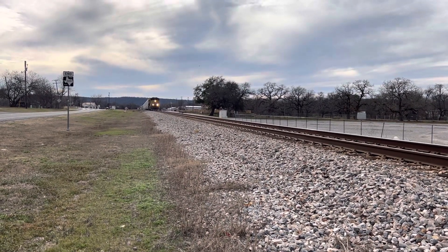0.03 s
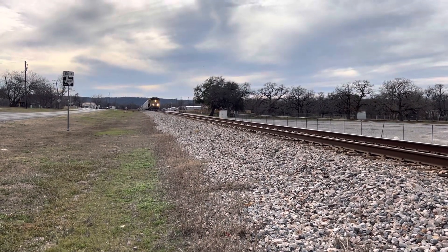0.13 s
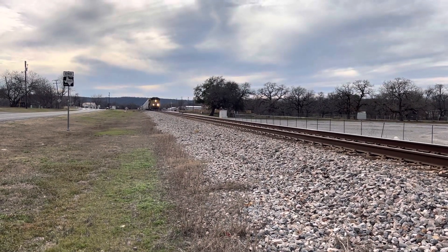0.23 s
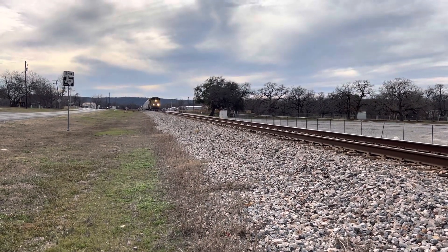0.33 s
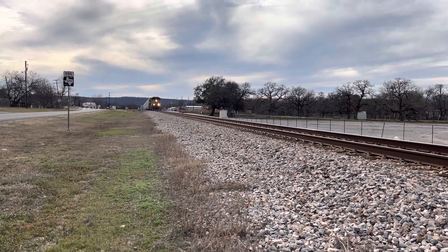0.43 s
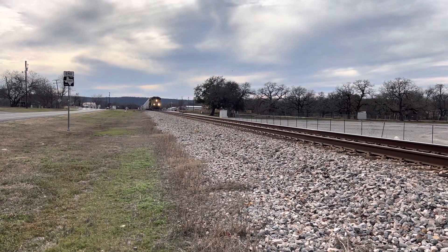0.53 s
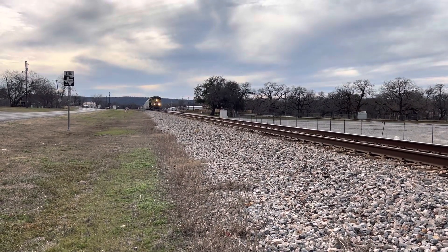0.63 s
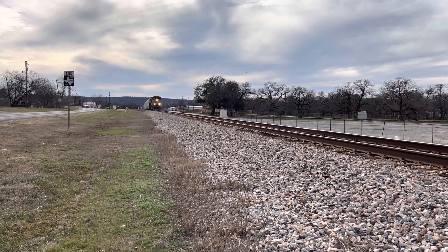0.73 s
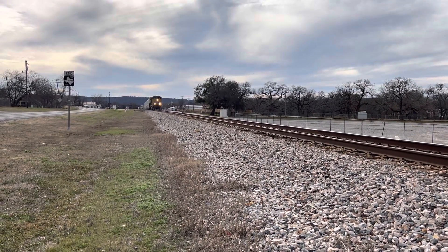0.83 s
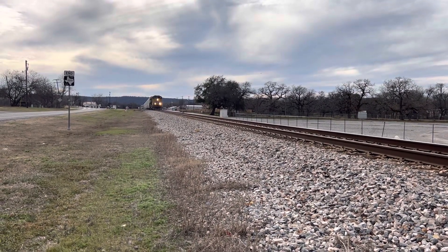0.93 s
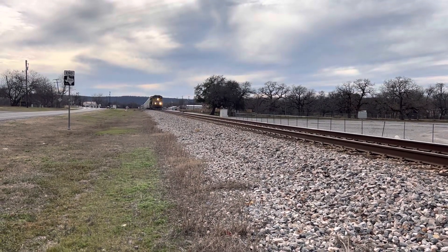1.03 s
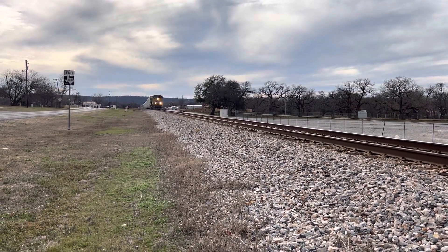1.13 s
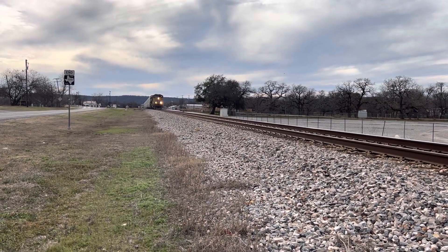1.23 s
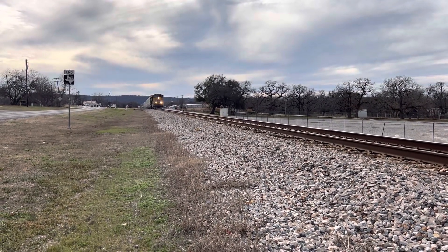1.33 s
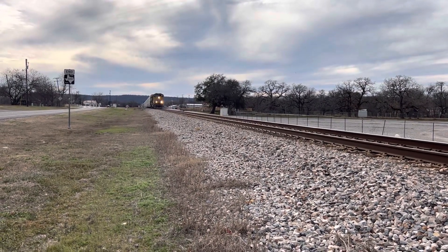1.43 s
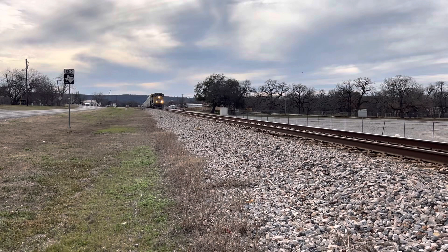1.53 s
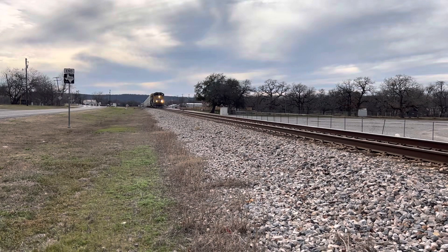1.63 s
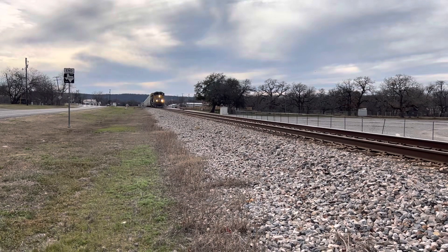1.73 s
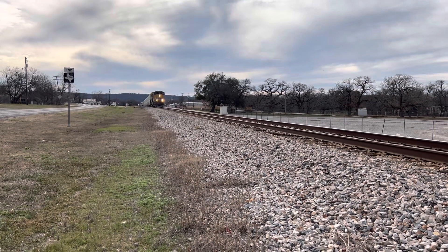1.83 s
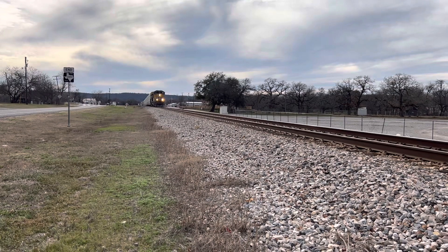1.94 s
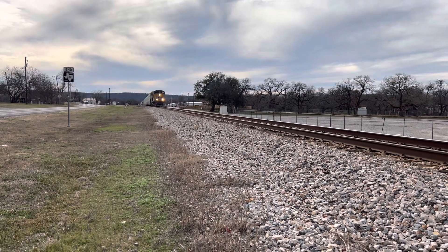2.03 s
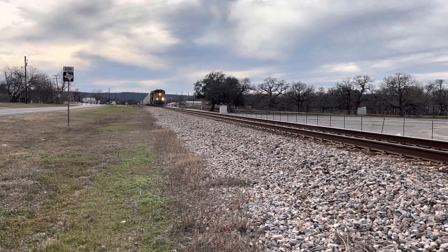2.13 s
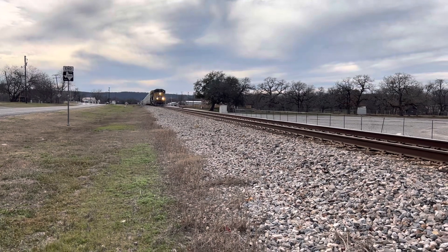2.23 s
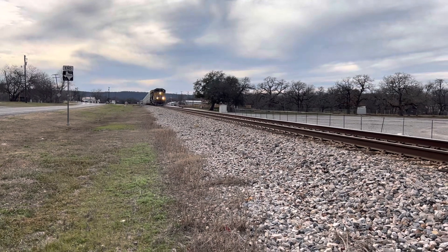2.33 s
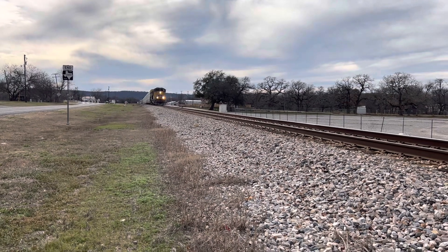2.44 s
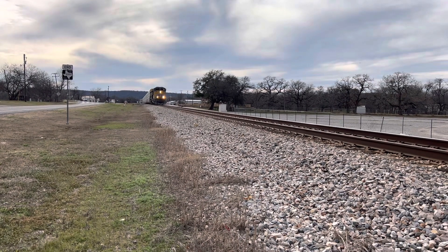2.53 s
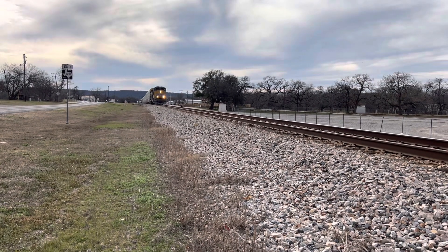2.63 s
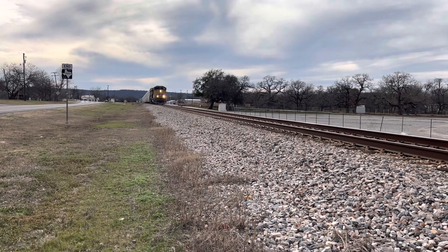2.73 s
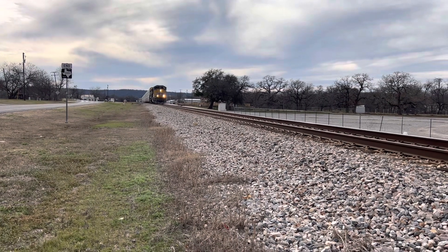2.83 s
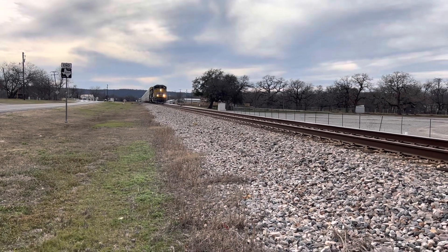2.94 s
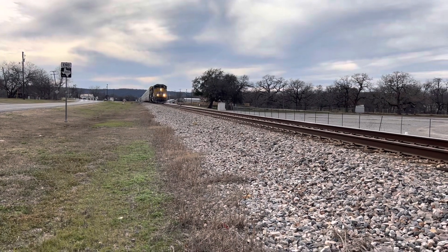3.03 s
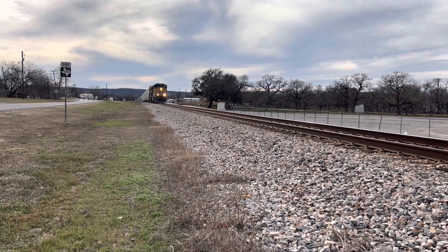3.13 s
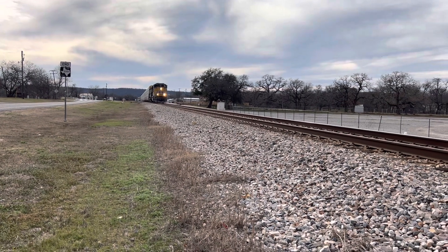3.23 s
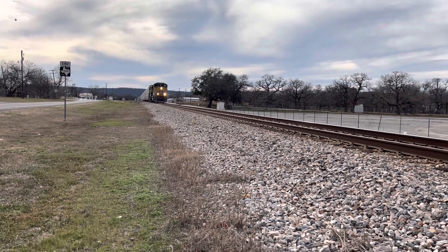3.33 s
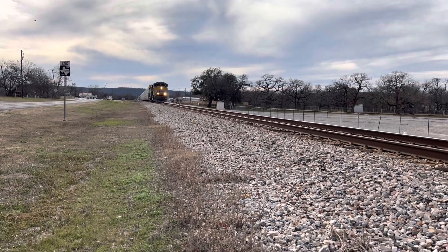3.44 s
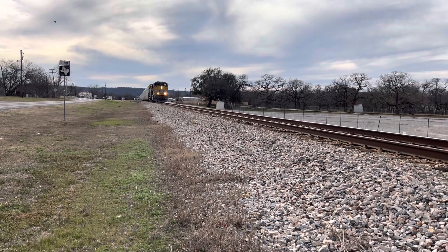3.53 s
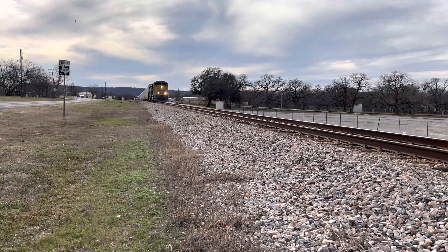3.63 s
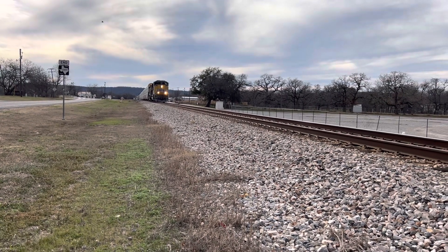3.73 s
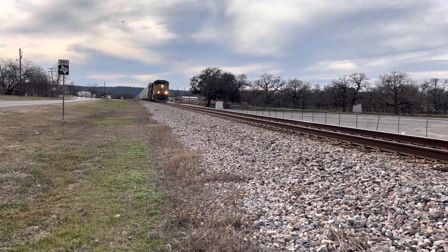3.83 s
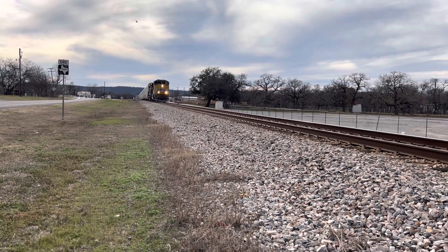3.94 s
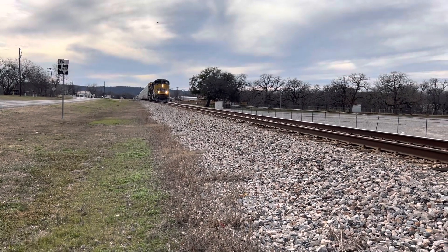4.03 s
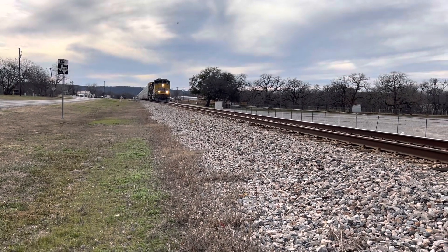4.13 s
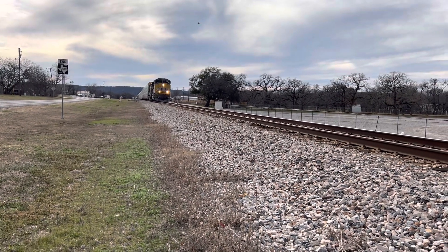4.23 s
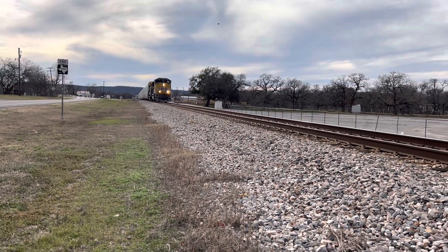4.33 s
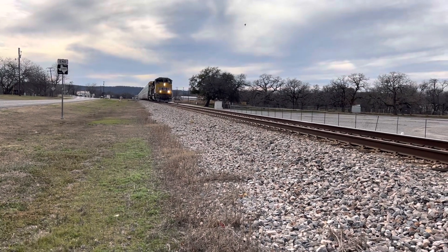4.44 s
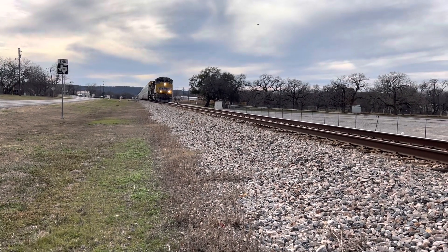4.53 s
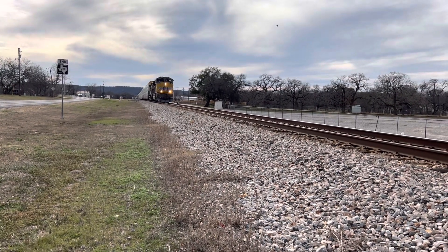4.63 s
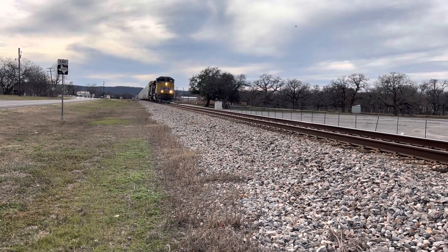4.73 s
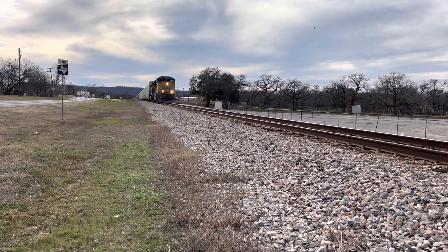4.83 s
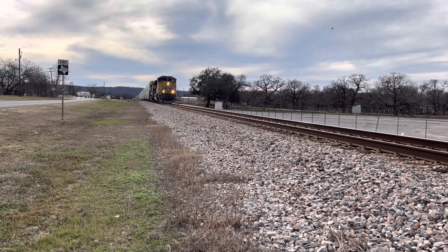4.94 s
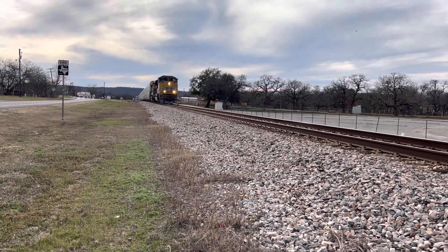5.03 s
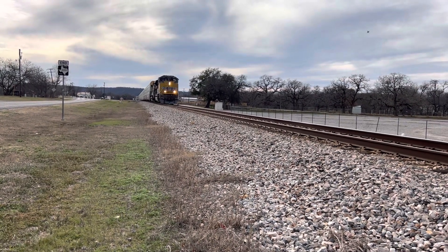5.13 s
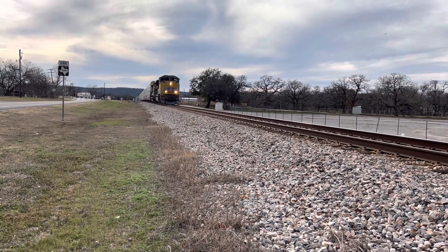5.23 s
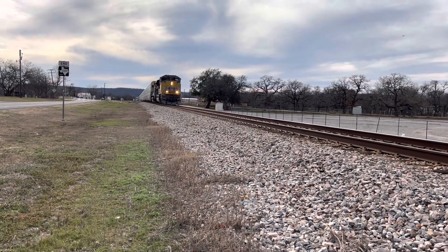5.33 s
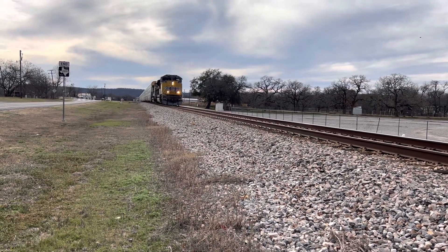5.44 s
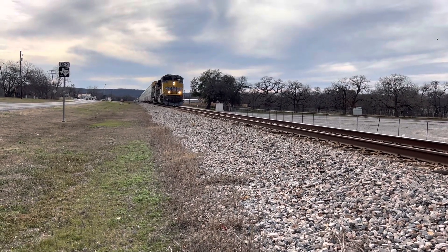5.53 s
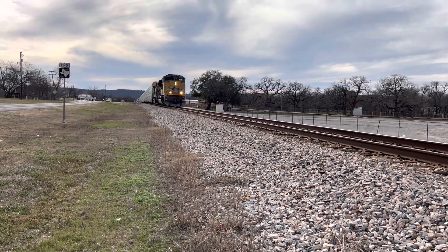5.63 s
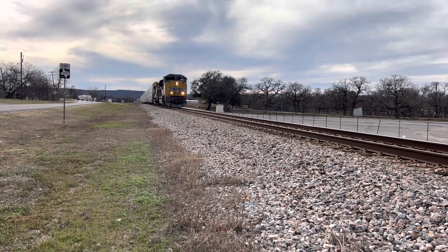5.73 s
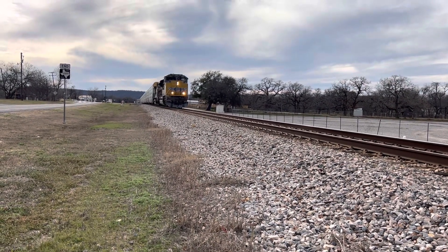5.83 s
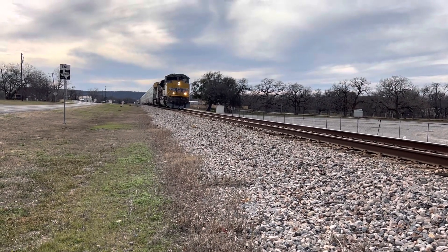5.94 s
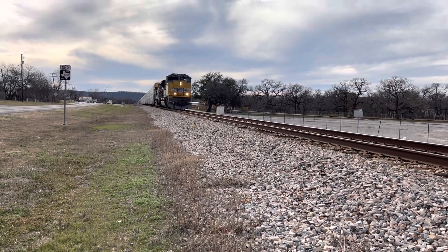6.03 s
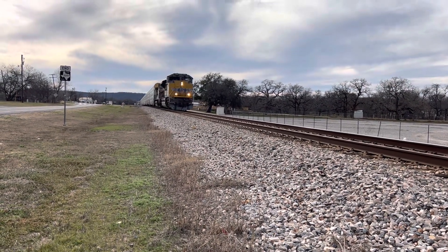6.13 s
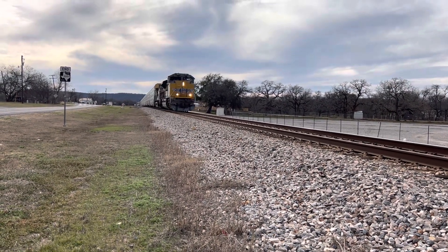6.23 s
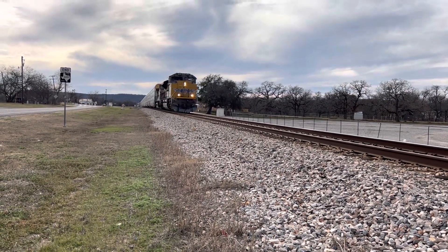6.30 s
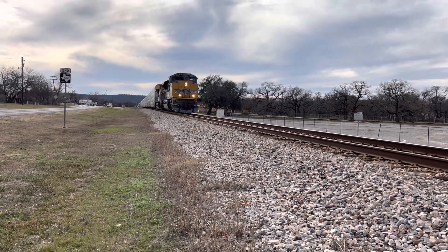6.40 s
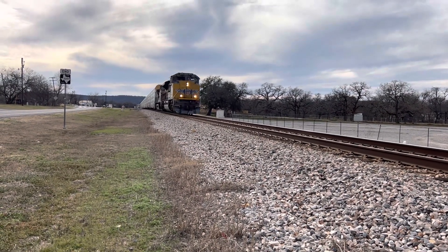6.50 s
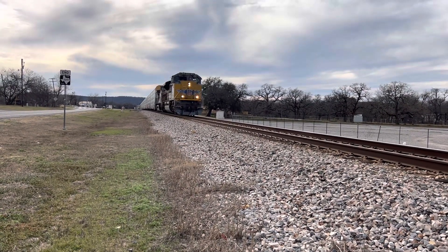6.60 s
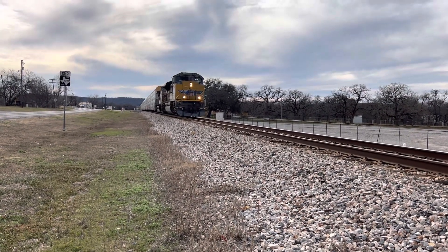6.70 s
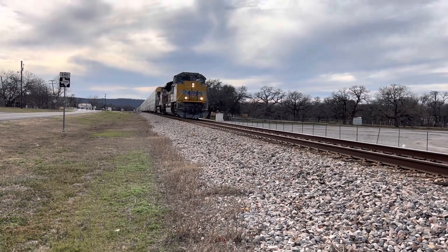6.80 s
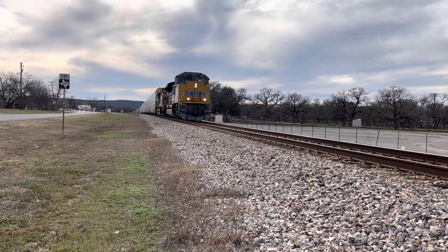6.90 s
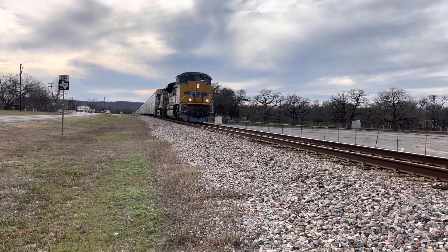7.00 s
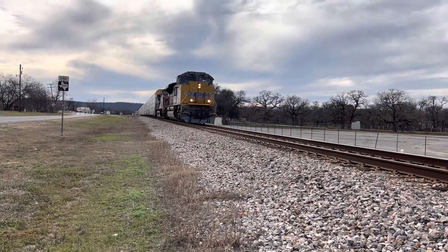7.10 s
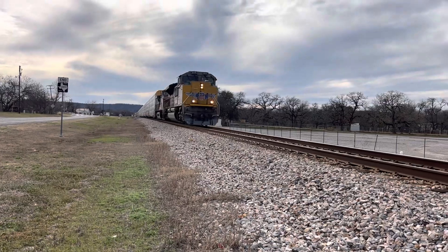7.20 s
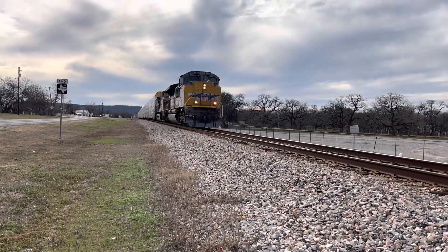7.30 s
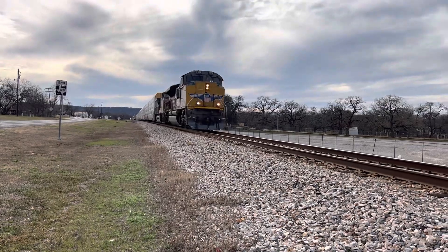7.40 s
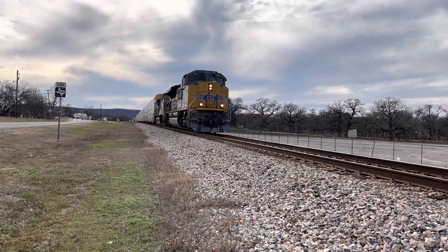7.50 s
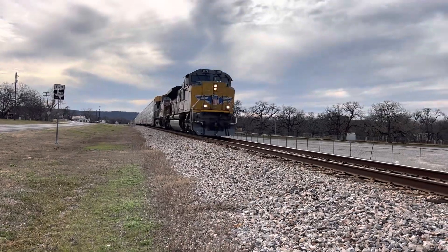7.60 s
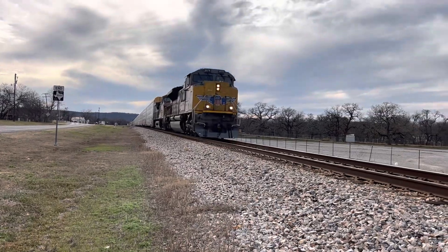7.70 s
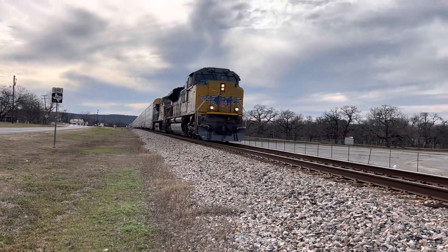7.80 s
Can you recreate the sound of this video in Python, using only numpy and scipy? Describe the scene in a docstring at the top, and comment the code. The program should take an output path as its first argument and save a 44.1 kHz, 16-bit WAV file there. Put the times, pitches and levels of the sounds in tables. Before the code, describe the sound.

Distant throbbing diesel engines grow into a broad roar with wavering motor whine, faint hissing rails, sparse ticks and a dull wind bump halfway.

```python
"""Diesel locomotives come down a straight track towards two microphones in open country.
Throughout, sines at the exhaust orders throb under a growing roar of filtered noise, tones and bands of
motor whine come and go, and noise through sharp resonances makes the rails sing ahead of the wheels.
At first a gliding tone is a vehicle far off; decaying snaps and knocks click close by, early and late.
Ringing rail ticks follow, short pushes of dull noise are a gust halfway, and one motor comes clear late."""
import sys
import numpy as np
from scipy import signal
from scipy.fft import rfft, irfft, next_fast_len
from scipy.io import wavfile
from scipy.ndimage import uniform_filter1d, map_coordinates

SR = 44100
rng = np.random.default_rng(int(sys.argv[2]) if len(sys.argv) > 2 else 0)


def master_out(mix):
    """Clip the mix to full scale and print it as 16-bit PCM to the path in sys.argv[1]."""
    frames = np.transpose(np.atleast_2d(mix))
    ceiling = np.clip(frames, -1, 1)
    pcm = np.round(ceiling * 32767).astype(np.int16)
    wavfile.write(sys.argv[1], SR, pcm)


def voltage_ratio(decibels):
    """Convert decibels (scalar or array-like) to amplitude ratios, 20 dB per decade."""
    exponent = np.asarray(decibels, float) / 20
    return 10 ** exponent


N = 346615

SPEED_M_S, PASSES_S = 20, 10.27  # the distance would reach zero at PASSES_S, after the end
REFERENCE_M = 50


def seconds():
    """Sampling principle: the time of every sample."""
    return np.arange(N) / SR


def unit(x):
    """Normalisation: scale to rms 1."""
    return x / np.sqrt(np.mean(x ** 2) + 1e-20)


def along(points, hz):
    """Logarithmic frequency scale: interpolate (Hz, value) points on a log axis."""
    f, v = np.transpose(points)
    return np.interp(np.log(hz + 1), np.log(f + 1), v)


def curves(rows):
    """Linear interpolation in time: one curve for each column after the time."""
    s, *cols = np.transpose(rows)
    return [np.interp(seconds(), s, c) for c in cols]


def sounding(rows):
    """Gating: a linear fade of 0.1 s centred on each end of a table's span."""
    t = seconds()
    inside = np.minimum(t - rows[0][0], rows[-1][0] - t)
    return np.clip(inside / .1 + .5, 0, 1)


def wobble(rate):
    """Slow random modulation: a smooth curve through `rate` random knots a second."""
    knots = rng.standard_normal(int(N * rate / SR) + 4)
    return map_coordinates(knots, [np.arange(N) * rate / SR])


def filtered(x, response):
    """Linear filtering: multiply the spectrum by a complex response of frequency."""
    m = next_fast_len(N + 8192)
    return irfft(rfft(x, m) * response(np.fft.rfftfreq(m, 1 / SR)), m)[..., :N]


def peaks(modes, hz):
    """Resonance: gain of a set of (Hz, width Hz, dB) modes, summed in power."""
    return np.sqrt(sum(voltage_ratio(db) ** 2 / (1 + (2 * (hz - c) / w) ** 2) for c, w, db in modes))


def patchy(patchy_db):
    """Random modulation in time and frequency: two noises share the same patches of gain."""
    z = signal.stft(rng.standard_normal((2, N)), nperseg=512)[2]
    field = uniform_filter1d(rng.standard_normal(z.shape[1:]), size=5, axis=0)
    field = uniform_filter1d(field, size=12, axis=1)
    return signal.istft(z * voltage_ratio(patchy_db * unit(field)), nperseg=512)[1][:, :N]


def spread(pair, gain, alike, lead):
    """Interchannel coherence: mix two noises to a given likeness and phase lead, rms 1."""
    def turn(hz):
        return np.arccos(np.clip(alike(hz), -1, 1)) / 2

    mid, side = filtered(pair, lambda hz: gain(hz) * [np.cos(turn(hz)), np.sin(turn(hz))])
    left_right = np.array([mid + side, mid - side])
    # half the phase lead on the left, half a lag on the right
    return unit(filtered(left_right, lambda hz: np.exp(.5j * np.outer([1, -1], lead(hz)))))


# Phase between the microphones. Each row: frequency in Hz, lead of the left in radians.
PHASE_LEAD = [(100, 0), (500, -.5), (1400, -3), (2200, .2), (3000, 1.6), (4000, .6), (7000, .4)]


def far_tone(pitch):
    """Interchannel phase: a tone through the air reaches the two microphones out of step."""
    lead = 0.64 * along(PHASE_LEAD, pitch.mean()) / (4 * np.pi)  # cycles each way
    return np.array([tone(pitch, lead), tone(pitch, -lead)])


# Coherence of air-borne noise at the microphones. Each row: frequency in Hz, likeness from 0 to 1.
COHERENCE = [(60, 0.97), (140, 0.94), (330, 0.92), (600, 0.75), (1100, 0.11), (1600, 0.26), (2200, 0.63),
             (3400, 0.92), (4000, .7), (5000, 0.83), (6200, 0.41), (7000, 0.17)]


def airborne(gain, patchy_db):
    """Spatial coherence: noise through the air is less alike at some frequencies than at others."""
    return spread(patchy(patchy_db), gain,
                  lambda hz: along(COHERENCE, hz), lambda hz: along(PHASE_LEAD, hz))


def tone(hz, start=0):
    """Phase accumulation: a sine of rms 1 follows a pitch curve from a start in cycles."""
    return np.sqrt(2) * np.sin(2 * np.pi * (np.cumsum(hz) / SR + start))


def distance():
    """Uniform motion: metres from the lead locomotive."""
    return SPEED_M_S * (PASSES_S - seconds())


def nearing(db, growth):
    """Distance law: gain rises as a power of nearness, from `db` at the reference distance."""
    return voltage_ratio(db) * (REFERENCE_M / distance()) ** growth


def by_rail(db, loss_db):
    """Even damping: sound along the steel loses a fixed number of dB per metre."""
    return voltage_ratio(db - loss_db * (distance() - REFERENCE_M))


# Strongest exhaust order, the eighth. Each row: time in seconds, level in dB.
EIGHTH_ORDER = [(0.0, -28), (0.15, -27), (1.95, -27.5), (2.28, -23), (2.74, -29.5), (3.08, -21.5),
                (3.24, -29), (3.72, -21), (3.94, -26.5), (4.07, -20), (4.27, -27), (4.88, -19.5),
                (5.28, -24.5), (5.82, -21), (6.61, -21.5), (7.57, -15), (7.68, -21.5), (7.86, -22)]
# Weaker orders of the same cycle; the two neighbours beat with the eighth.
# Each row: order, level in dB at the reference distance, exponent of growth with nearness.
WEAKER_ORDERS = [(7, -37, 0.38), (9, -32, 1.37), (10, -41.5, 0.46), (11, -39.5, 0.4), (12, -38, 0.3),
                 (13, -34, 1.13), (15, -36.5, 1.37), (18, -33.5, 2.26)]
# A second engine, a little faster. Each row: frequency in Hz, level in dB at the reference distance.
SECOND_ENGINE = [(47.4, -37.5), (60.15, -24.5), (66.4, -34.5), (80.6, -36), (99.6, -35.5)]


def exhaust():
    """Harmonic series: uneven cylinders give every order of the cycle, and each order wavers."""
    cycle_hz, in_step_s = 6.459, .196  # engine cycles a second; a moment when the orders are in step
    cycles = cycle_hz * (seconds() - in_step_s)

    def order(k, slip):
        return np.sqrt(2) * np.cos(2 * np.pi * (k * cycles + slip))

    out = voltage_ratio(curves(EIGHTH_ORDER)[0] + .5 * wobble(5)) * order(8, .02 * wobble(3))
    for k, db, growth in WEAKER_ORDERS:
        level = nearing(db, growth) * voltage_ratio(1.77 * wobble(1.913))
        out = out + level * order(k, slip=0.075 * wobble(2.444))
    for hz, db in SECOND_ENGINE:
        level = nearing(db, growth=0.72) * voltage_ratio(3.2 * wobble(2.045))
        out = out + level * tone(hz + .5 * wobble(2.976), rng.random())
    return out


# Low rumble, swelling with the gust. Each row: time in seconds, level in dB.
RUMBLE_LEVEL = [(0, -36), (.9, -40.5), (1.7, -39), (2.6, -38.5), (3.3, -30.5), (3.8, -20), (4.1, -26),
                (4.5, -25.5), (5, -31), (5.3, -30.5), (6.4, -30), (7.4, -31), (7.86, -28)]
# Rumble spectrum. Each row: frequency in Hz, relative density in dB per Hz.
RUMBLE_SPECTRUM = [(12, -32.5), (20, -9.5), (43, 3), (65, -3), (80, -7), (118, -7), (231, -24),
                   (300, -24.5), (390, -64), (660, -120)]


def rumble():
    """Broadband low-frequency noise: train and wind together."""
    level = voltage_ratio(curves(RUMBLE_LEVEL)[0] + 1.1 * wobble(8))
    return level * airborne(lambda hz: voltage_ratio(along(RUMBLE_SPECTRUM, hz)), patchy_db=.3)


# Middle of the roar. Each row: frequency in Hz, relative density in dB per Hz.
BODY_SPECTRUM = [(88, -28.5), (150, 3.5), (346, -8.5), (389, -5), (443, -8), (655, -9.5), (805, -3.5),
                 (957, -13.5), (1200, -14.5), (1320, -18), (2000, -22), (2600, -59.5), (4400, -120)]


def body():
    """Distance law on shaped noise: the middle of the roar grows as the train nears."""
    level = nearing(-30.5, growth=1.522) * voltage_ratio(0.27 * wobble(3.74))
    return level * airborne(lambda hz: voltage_ratio(along(BODY_SPECTRUM, hz)), patchy_db=2.25)


# Top of the roar. Each row: frequency in Hz, relative density in dB per Hz.
HISS_SPECTRUM = [(760, -37.5), (1300, -11), (1520, 4), (1750, -16.5), (1950, -4.5), (2270, -4), (2760, -6),
                 (3380, -12), (3850, -15), (4290, -15), (6090, -21), (7110, -24), (8300, -26.5),
                 (10800, -54), (18300, -120)]
# Fan and turbocharger bands. Each row: frequency in Hz, width in Hz, level in dB beside the hiss.
FAN_BANDS = [(2770, 5.7, -7.5), (2795, 10, 4), (3020, 32, 2.5), (3820, 180, 3.5), (3970, 190, 3)]


def hiss():
    """Air absorption: the upper hiss grows faster than the lower as less air lies between."""
    flutter = voltage_ratio(.5 * wobble(6))
    noise = flutter * airborne(
        lambda hz: voltage_ratio(along(HISS_SPECTRUM, hz)) * np.hypot(1, peaks(FAN_BANDS, hz)), patchy_db=1.2)
    upper = filtered(noise, lambda hz: 1 / (1 + (4200 / (hz + 1)) ** 4))
    lower = noise - upper
    return nearing(-46.5, growth=1.36) * lower + nearing(-43.5, growth=3.02) * upper


# Level of the motor hum and its tones. Each row: time in seconds, level in dB.
HUM_LEVEL = [(0, -57), (1, -55.5), (2, -51), (3, -48.5), (4, -50), (4.8, -48.5), (5.5, -46.5), (6.2, -46.5),
             (6.8, -46), (7.3, -41), (7.86, -39.5)]
# Clusters of unsteady tones. Each row: frequency in Hz, width in Hz, relative level in dB.
HUM_BANDS = [(368, 13, -10.5), (768, 67, -10.5), (807, 14, -3), (797.7, 7.4, 0), (1180, 32, -5.5),
             (1208, 23, -11.5), (1580, 13, -14)]
# Drifting tones. Each row: far pitch in Hz, near pitch in Hz, far level in dB beside the hum,
# near level in dB beside the hum.
DRIFTING_TONES = [(379.4, 386, -10.5, -8), (773, 779, -5.5, -12.5), (794, 793, -5, -14), (811, 827, -4, -8),
                  (1170, 1160, -14, -16.5), (2760, 2720, -25, -24)]


def motor_hum():
    """Superposition: several traction motors near one pitch blur into bands with drifting tones."""
    hum = voltage_ratio(curves(HUM_LEVEL)[0])
    waver = voltage_ratio(1.3 * wobble(3.065) + 1.17 * wobble(9))
    bands = airborne(lambda hz: peaks(HUM_BANDS, hz) / (1 + (hz / 2500) ** 4), patchy_db=.6)
    out = hum * waver * bands
    for far_hz, near_hz, far_db, near_db in DRIFTING_TONES:
        pitch = np.linspace(far_hz, near_hz, N) * (1 + .002 * wobble(1.5) + .002 * wobble(8))
        level = voltage_ratio(np.linspace(far_db, near_db, N) + 2.08 * wobble(1.31) + 1.6 * wobble(12))
        out = out + hum * level * far_tone(pitch)
    return out


# One motor that comes clear late. Each row: time in seconds, level in dB.
WHINE_LEVEL = [(5.7, -62), (6.0, -53.5), (6.9, -45), (7.3, -48), (7.6, -43), (7.9, -63)]
# Its partials. Each row: multiple of the tooth rate, relative level in dB at the end of the whine,
# further rise in dB per second.
TOOTH_PARTIALS = [(2, -3.5, 6), (4, 2.5, 5.5), (6, 0.5, 1), (7, -7, 11)]


def motor_whine():
    """Gear meshing: the partials are multiples of one tooth rate."""
    tooth_hz = 199.5 * (1 + .0004 * wobble(4))
    before_end = seconds() - WHINE_LEVEL[-1][0]  # negative until the whine ends
    partials = 0
    for multiple, db, rise_db in TOOTH_PARTIALS:
        level = voltage_ratio(db + rise_db * before_end + 1.3 * wobble(6.8))
        partials = partials + level * far_tone(multiple * tooth_hz)
    return sounding(WHINE_LEVEL) * voltage_ratio(curves(WHINE_LEVEL)[0]) * partials


# Machine tones that come clear for a while. Each row: start in seconds, end in seconds,
# first pitch in Hz, last pitch in Hz, level in dB.
CLEAR_SPELLS = [(4.3, 5.1, 792, 792, -53), (5.2, 5.9, 1174, 1171, -53), (5, 7.2, 2846, 2846, -70),
                (6.3, 7, 5550, 5530, -75), (6.4, 7.8, 767, 749, -52), (6.9, 7.9, 178, 174, -42),
                (7.3, 8.1, 396, 391, -43), (7.5, 8.1, 1165, 1165, -51)]


def passing_tones():
    """Amplitude modulation: the higher the tone, the faster the air breaks it up."""
    out = np.zeros((2, N))
    for start, end, from_hz, to_hz, db in CLEAR_SPELLS:
        u = np.clip((seconds() - start) / (end - start), 0, 1)
        pitch = (from_hz + (to_hz - from_hz) * u) * (1 + .002 * wobble(8))
        swell = np.sqrt(np.abs(np.sin(np.pi * u)))
        out = out + voltage_ratio(db + 3 * wobble(5 + from_hz / 90)) * swell * far_tone(pitch)
    return out


def rail_lead(hz):
    """Arrival-time difference: rail sound reaches the right microphone first (radians)."""
    return -2 * np.pi * (hz - 8230) / 3740


# Higher rail band. Each row: frequency in Hz, relative density in dB per Hz.
HIGH_RAIL_SPECTRUM = [(10400, -33), (11100, -2.5), (12000, 2), (13200, -6.5), (14000, -3), (15000, -1.5),
                      (15700, -4), (16500, -18)]
# Lower rail band. Each row: frequency in Hz, relative density in dB per Hz.
LOW_RAIL_SPECTRUM = [(7000, -21), (8300, -19.5), (8800, -0.5), (9300, 0), (9600, -10.5), (10000, -3),
                     (10800, -5.5), (11300, -35)]
# Rail modes that stand out. Each row: frequency in Hz, width in Hz, level in dB beside the band.
STEEL_MODES = [(9450, 33, 14.5), (9400, 38, 4.5), (9800, 30, 3.5), (9900, 90, 11), (10700, 30, -2),
               (11070, 48, 7.5), (11140, 21, 13.5), (11488, 30, 11), (11900, 15, 9), (12298, 30, 5.5),
               (13257, 30, 6.5), (13838, 30, 0.5), (13900, 21, 18.5), (15100, 30, 6), (15663, 30, 2.5)]


def rail_song():
    """Structure-borne sound: steel carries the highest pitches furthest ahead of the wheels."""
    def sing(band, noise, alike):
        return spread(noise, lambda hz: voltage_ratio(along(band, hz)) * np.hypot(1, peaks(STEEL_MODES, hz)),
                      lambda hz: alike + 0 * hz, rail_lead)

    high_level = by_rail(-57.5, loss_db=0.052) * voltage_ratio(.7 * wobble(8))
    low_level = by_rail(-55, loss_db=0.19) * voltage_ratio(0.63 * wobble(12))
    high = high_level * sing(HIGH_RAIL_SPECTRUM, patchy(1.6), alike=.995)
    low = low_level * sing(LOW_RAIL_SPECTRUM, patchy(1.1), alike=0.97)
    return high + low


# Wheel blows carried by the rail. Each row: time in seconds (8 ms after the onset),
# noise level in dB before rise, decay and filter, time in seconds to decay by 60 dB.
WHEEL_BLOWS = [(1.2865, -34.5, 0.28), (3.9125, -38, 0.27), (4.7183, -33.5, 0.47), (5.473, -55.5, 0.3),
               (5.946, -44, 0.35), (7.4729, -42, 0.25)]


def rail_ticks():
    """Impact and free decay: a quick rise, then each blow rings off along the rail."""
    def response(hz):
        highpass = 1 / np.sqrt(1 + (12900 / (hz + 1)) ** 24)
        return highpass * np.exp(.5j * np.outer([1, -1], rail_lead(hz)))

    out = np.zeros((2, N))
    for s, db, t60 in WHEEL_BLOWS:
        age = np.clip(seconds() - s + .008, 0, 1)
        rise = 1 - np.exp(-age / .004)
        blow = rise * voltage_ratio(db - 60 * age / t60) * rng.standard_normal(N)
        out = out + filtered(blow, response)
    return out


# Lumps of wind on the microphones. Each row: time in seconds (8 ms after the onset), peak in dB,
# length in seconds (the noise envelope peaks at a third of it), upper part in dB beside the dull part.
GUST_LUMPS = [(3.602, -27, .02, -12), (3.626, -20, 0.015, -9), (3.644, -13.5, 0.014, -30),
              (3.724, -10.5, 0.011, -1), (3.741, -10.5, 0.014, -7), (3.766, -15, 0.0078, -28),
              (3.794, -14, 0.016, -23), (3.836, -35, .02, -17), (3.877, -29.5, 0.051, -21),
              (3.922, -12, 0.013, -26), (5.326, -23.5, 0.023, -13)]


def gust():
    """Wind pressure: each lump is a brief push of dull noise, nearly the same at both microphones."""
    out, t = np.zeros((2, N)), np.arange(SR // 8) / SR
    low = signal.butter(3, [70, 290], "bandpass", fs=SR, output="sos")
    high = signal.butter(4, [330, 560], "bandpass", fs=SR, output="sos")
    # a single low swing, two cycles long, under every lump
    swing_hz, swing_db = 115, -3
    window = np.sin(np.pi * np.clip(swing_hz * t / 2, 0, 1)) ** 2
    swing = voltage_ratio(swing_db) * np.sin(2 * np.pi * swing_hz * t) * window
    for s, db, length, upper_db in GUST_LUMPS:
        a, b = rng.standard_normal((2, len(t)))
        push = t / length * np.exp(-3 * t / length)
        pushed = push * np.array([a + 0.2 * b, a - .15 * b])
        dull, rough = signal.sosfilt(low, pushed), signal.sosfilt(high, pushed)
        lump = swing + dull / np.abs(dull).max() + voltage_ratio(upper_db) * rough / np.abs(rough).max()
        first = round((s - .008) * SR)
        out[:, first:first + len(t)] += voltage_ratio(db) * lump / np.abs(lump).max()
    return out


# Close clicks. Each row: start in seconds, snap in dB before its filter, knock frequency in Hz,
# knock in dB; both levels are taken before the weighting of the two sides.
CLOSE_CLICKS = [(0.334, -76, 4900, -48), (1.163, -41, 620, -64), (1.1686, -32, 640, -30),
                (1.1806, -37, 1740, -28), (1.1877, -36.5, 1740, -30), (5.7742, -50, 900, -70),
                (6.1944, -53, 900, -70)]


def clicks():
    """Transient excitation: a sharp snap of noise with a short hollow knock."""
    out, t = np.zeros(N), np.arange(SR // 20) / SR
    snap_t60_s, knock_t60_cycles = .014, 22
    sos = signal.butter(6, [3400, 8600], "bandpass", fs=SR, output="sos")
    for s, db, hz, knock_db in CLOSE_CLICKS:
        snap = signal.sosfilt(sos, voltage_ratio(db - 60 * t / snap_t60_s) * rng.standard_normal(len(t)))
        knock = voltage_ratio(knock_db - 60 * t * hz / knock_t60_cycles) * np.sin(2 * np.pi * hz * t)
        first = round(s * SR)
        out[first:first + len(t)] += snap + knock
    # off to one side: the right microphone hears it 10 samples later and weaker
    return np.array([voltage_ratio(2.5) * out, voltage_ratio(-1.5) * np.roll(out, shift=10)])


# A vehicle engine speeding up far off. Each row: time in seconds, frequency in Hz, level in dB.
FAR_VEHICLE = [(0, 114, -49), (.3, 121, -44), (.6, 126, -42.5), (.9, 131, -44), (1.2, 140, -55),
               (1.8, 141, -58), (2.4, 142, -45)]


def road():
    """Frequency modulation: one engine order glides up far away."""
    hz, db = curves(FAR_VEHICLE)
    return sounding(FAR_VEHICLE) * voltage_ratio(db) * tone(hz)


# Still air over the fields. Each row: frequency in Hz, relative density in dB per Hz.
FIELD_SPECTRUM = [(88, -35), (150, -7.5), (200, 0), (261, -25), (378, -14), (625, -21.5), (791, -8.5),
                  (935, -12), (1160, -11), (1800, -25), (2360, -21), (3300, -28), (8300, -42.5),
                  (10800, -76), (18300, -120)]


def field():
    """Stationary background noise: the still air over the fields."""
    return voltage_ratio(-56) * airborne(lambda hz: voltage_ratio(along(FIELD_SPECTRUM, hz)), patchy_db=1.2)


def scene():
    """Superposition of pressures: train, rails, wind, clicks, road and fields."""
    roar = rumble() + body() + hiss()
    motors = motor_hum() + motor_whine() + passing_tones()
    rails = rail_song() + rail_ticks()
    return exhaust() + roar + motors + rails + gust() + clicks() + road() + field()


def roll_off(x):
    """The treble ends steeply here."""
    return signal.sosfilt(signal.butter(12, 17110, fs=SR, output="sos"), x)


# Colour of the microphone pair. Each row: frequency in Hz, left minus right in dB.
LEFT_OVER_RIGHT = [(60, 0.8), (400, 0.2), (800, 1.5), (1300, -1), (2400, 0.3), (3500, 2), (5500, 7.5),
                   (7500, 1.8), (9500, 0)]


def record(dry):
    """Band limiting: two microphones of slightly different colour lose deep bass and top treble."""
    low_hz, top_hz = 42, 15780

    def response(hz):
        band = (hz < top_hz) / np.sqrt(1 + (low_hz / (hz + 1)) ** 8)
        return band * voltage_ratio(np.outer([.5, -.5], along(LEFT_OVER_RIGHT, hz)))

    return roll_off(filtered(dry, response))


dry = scene()
out = record(dry)
master_out(out)
```